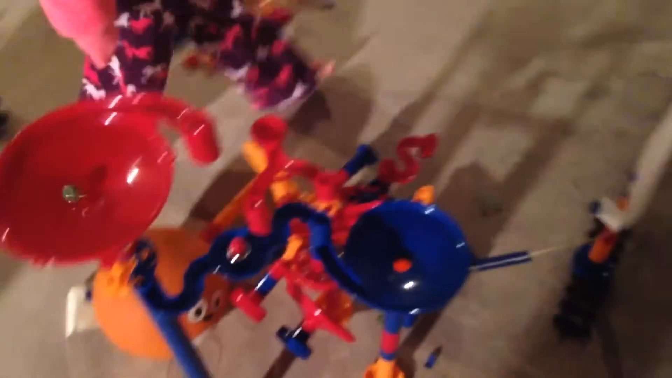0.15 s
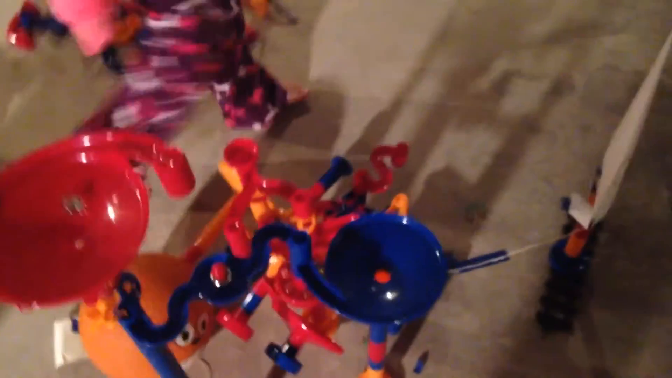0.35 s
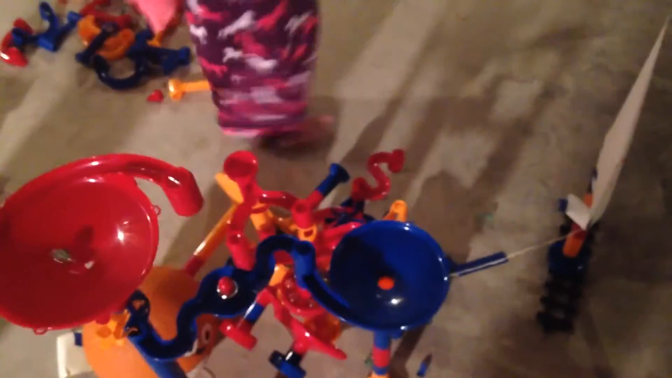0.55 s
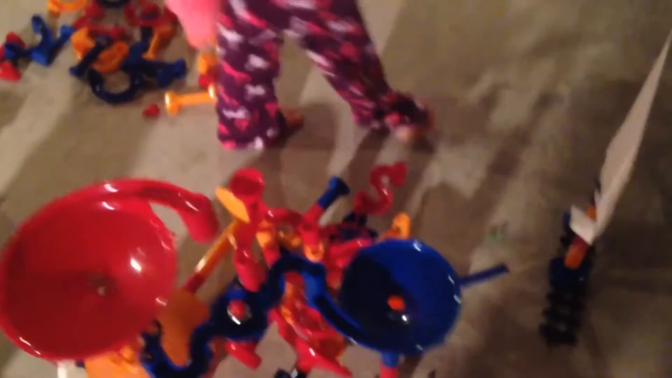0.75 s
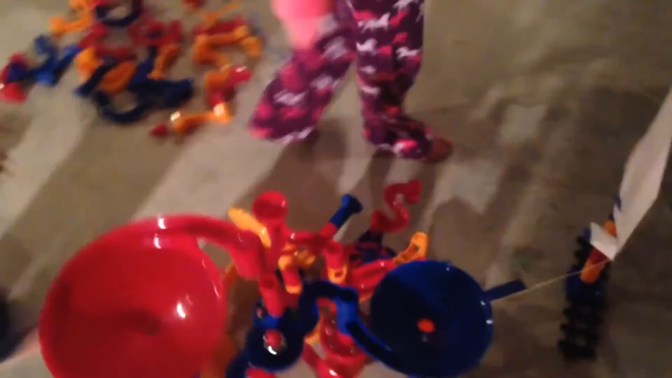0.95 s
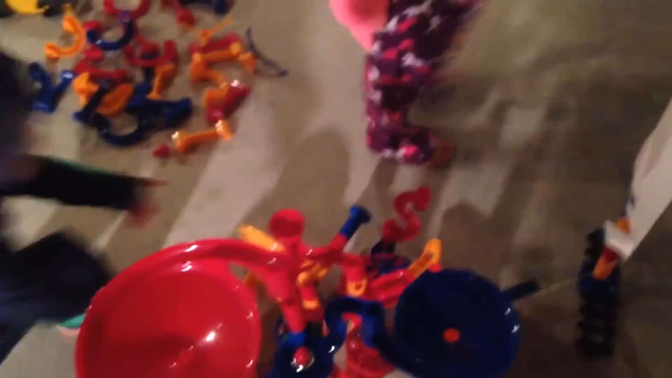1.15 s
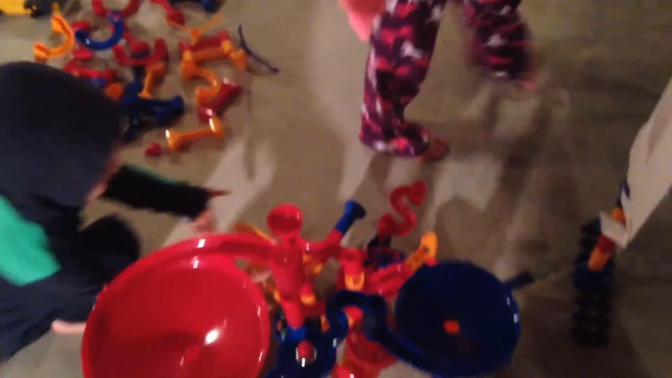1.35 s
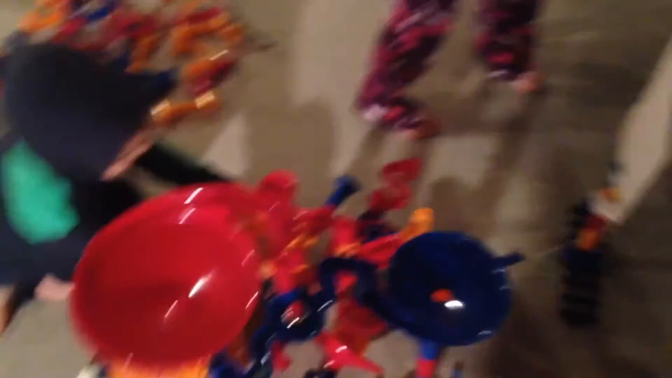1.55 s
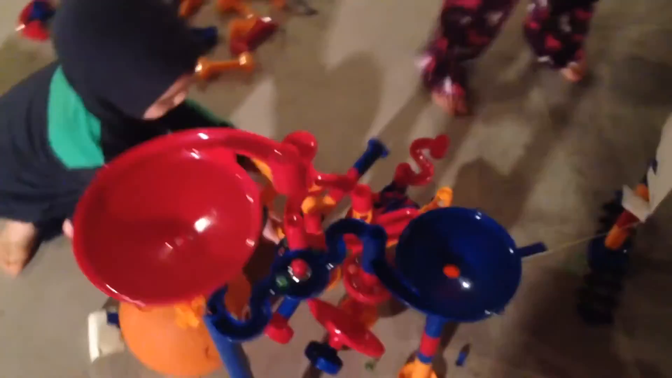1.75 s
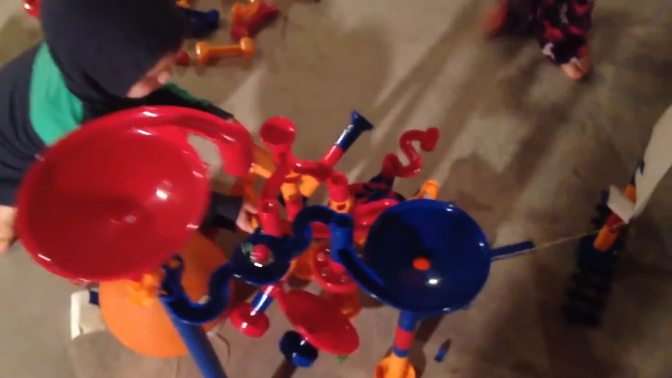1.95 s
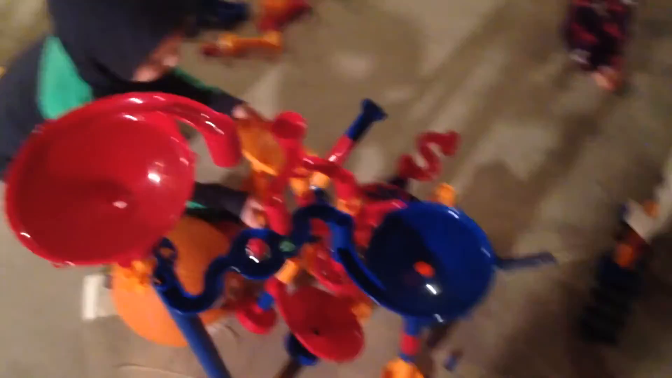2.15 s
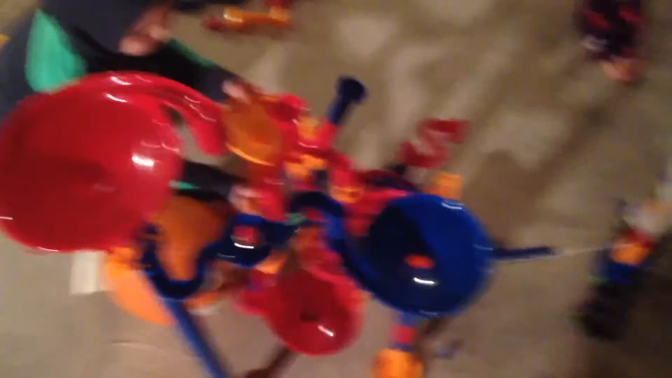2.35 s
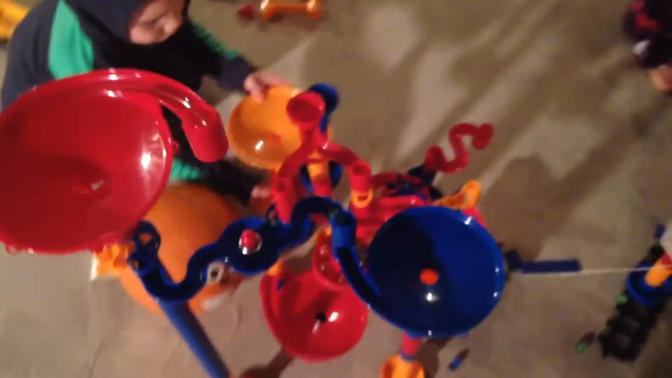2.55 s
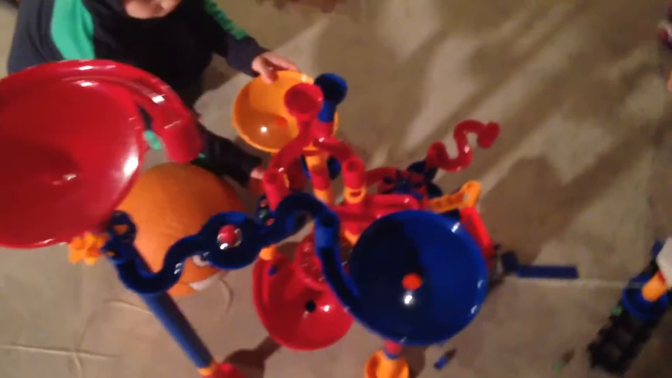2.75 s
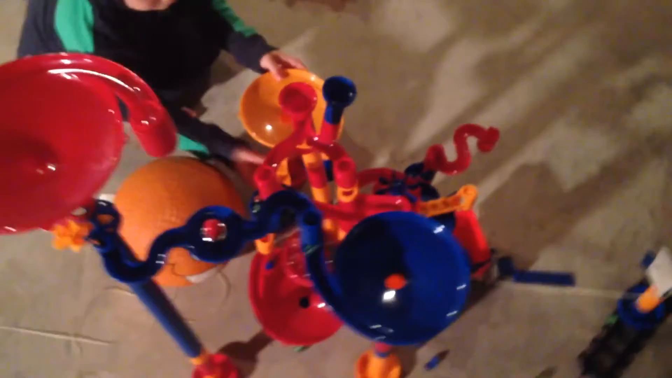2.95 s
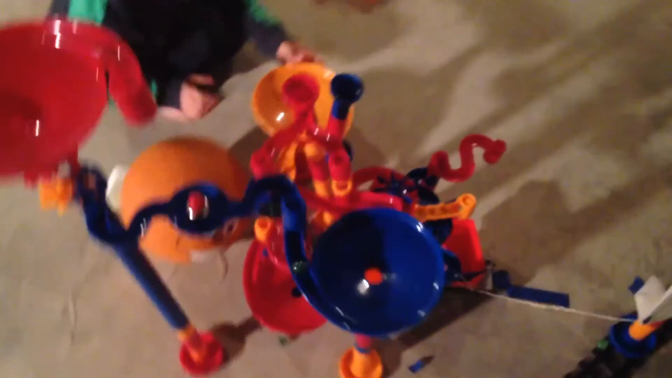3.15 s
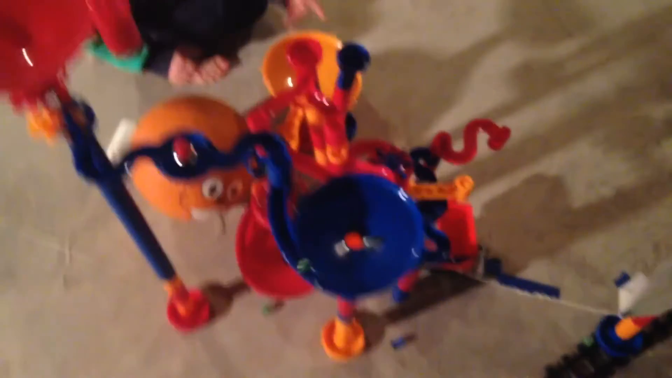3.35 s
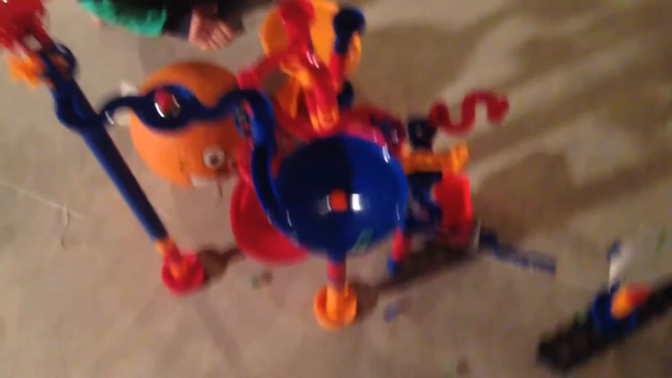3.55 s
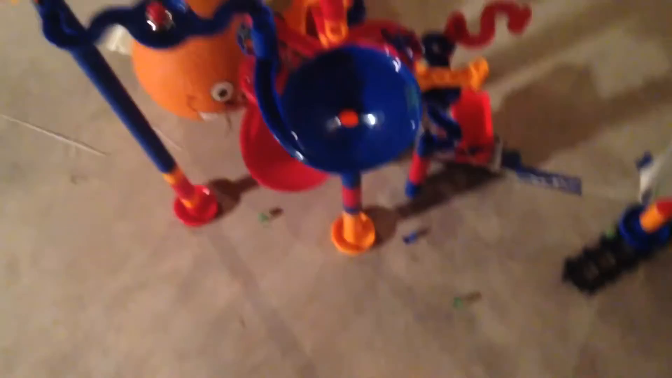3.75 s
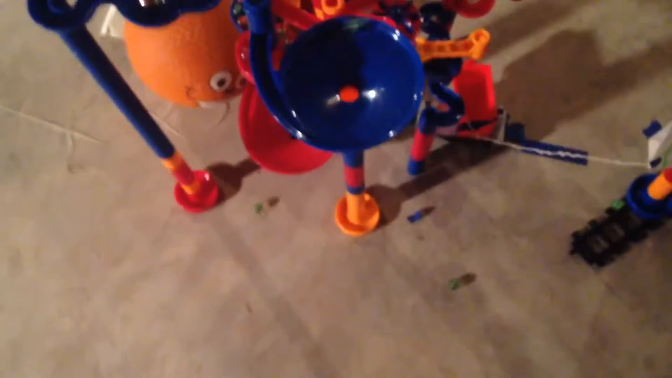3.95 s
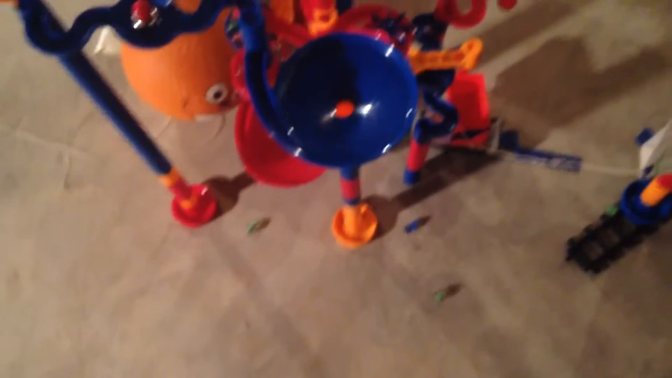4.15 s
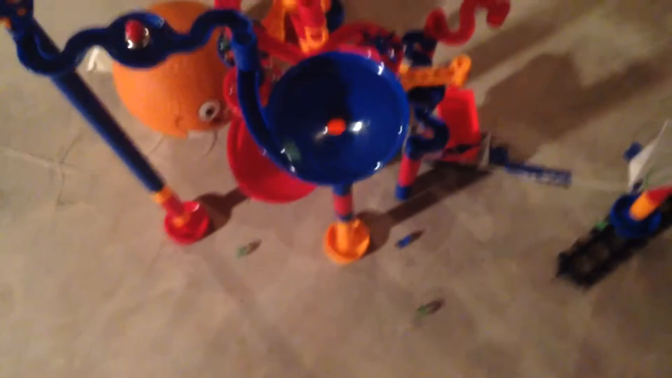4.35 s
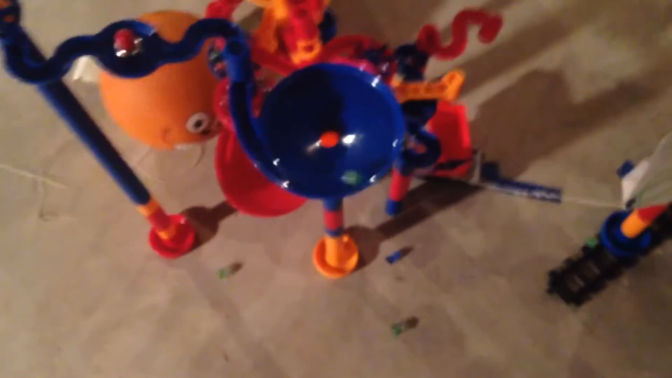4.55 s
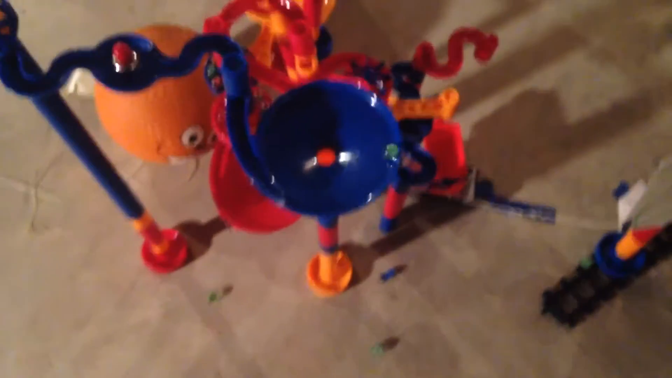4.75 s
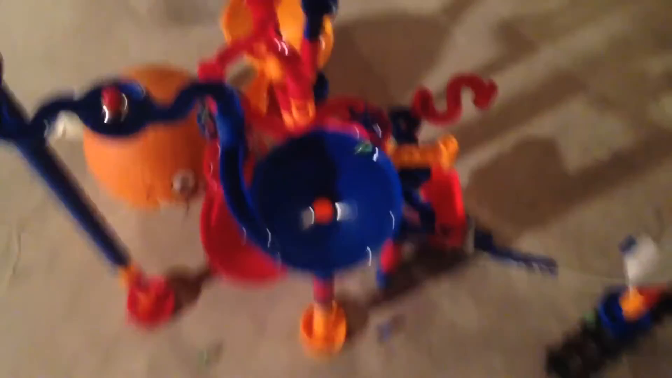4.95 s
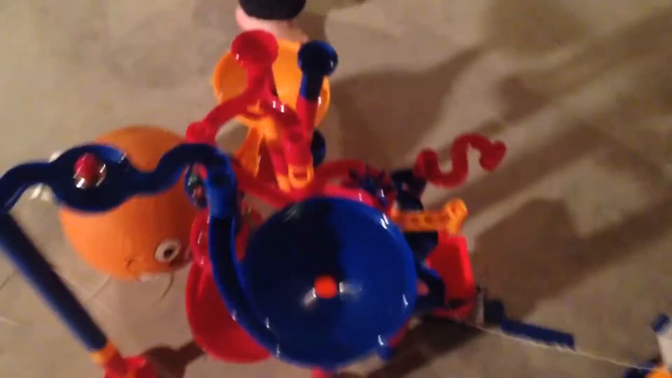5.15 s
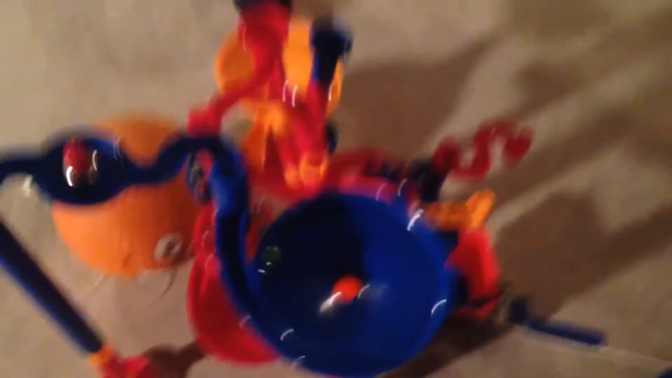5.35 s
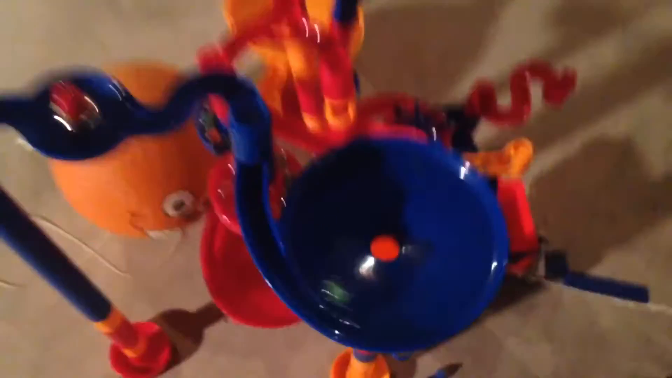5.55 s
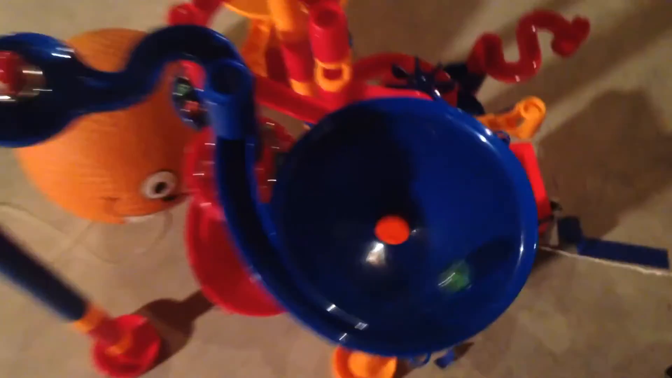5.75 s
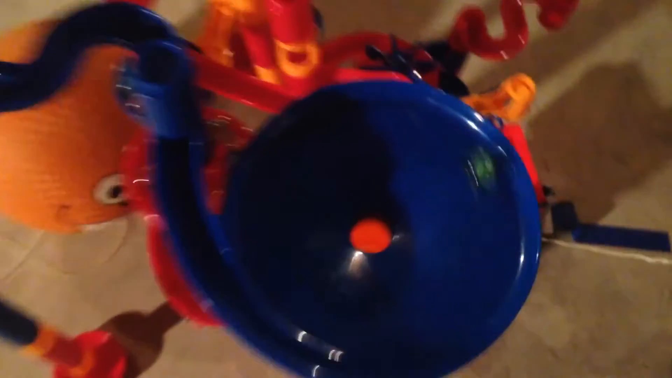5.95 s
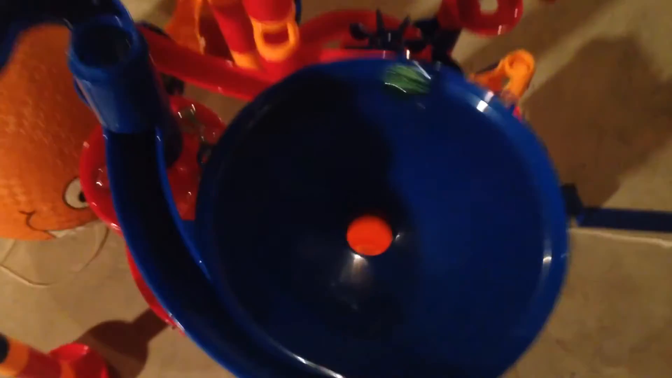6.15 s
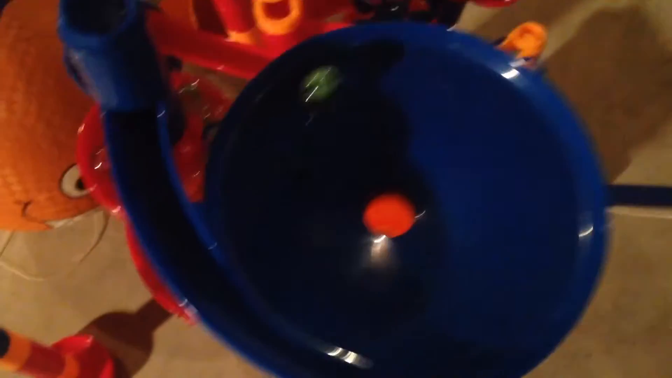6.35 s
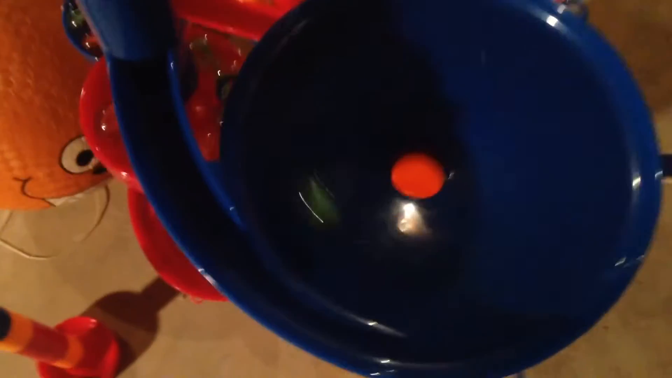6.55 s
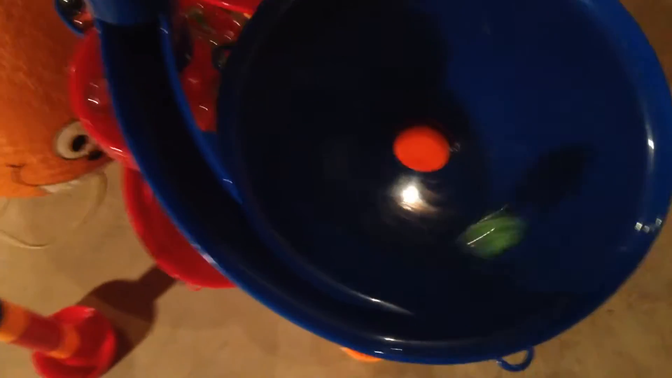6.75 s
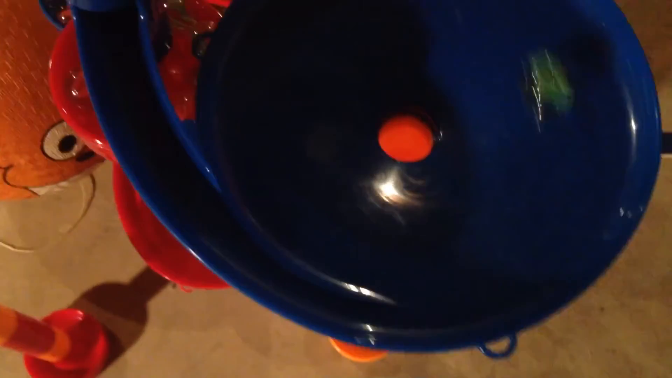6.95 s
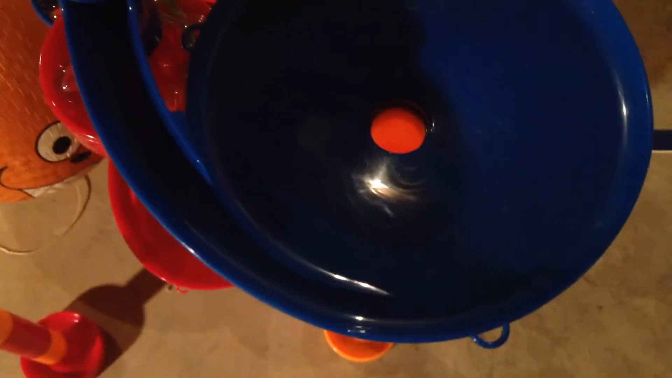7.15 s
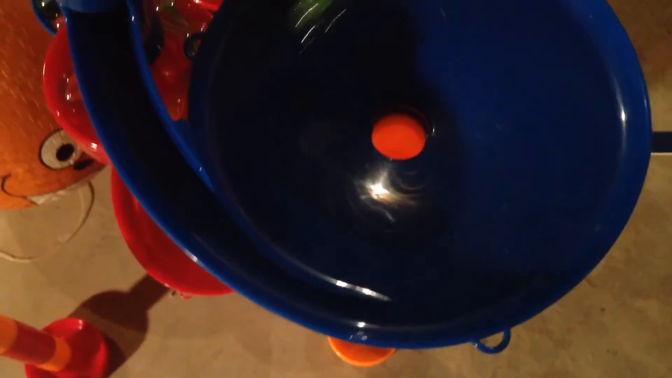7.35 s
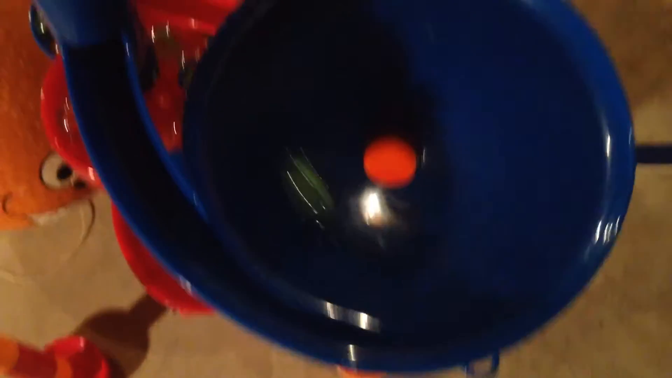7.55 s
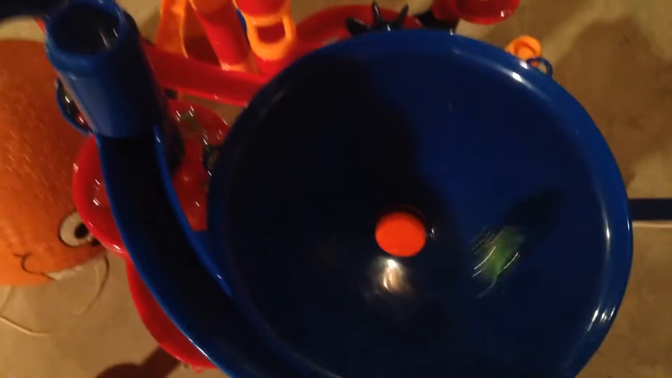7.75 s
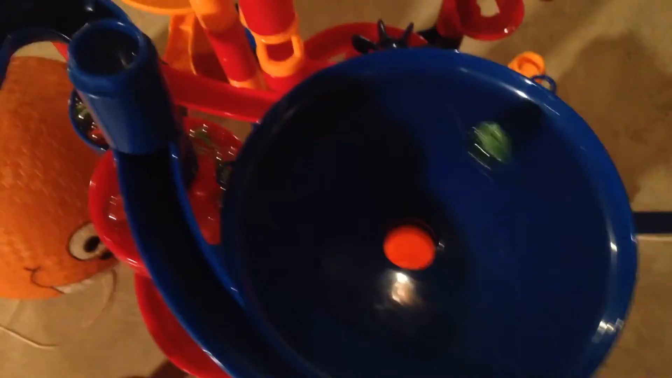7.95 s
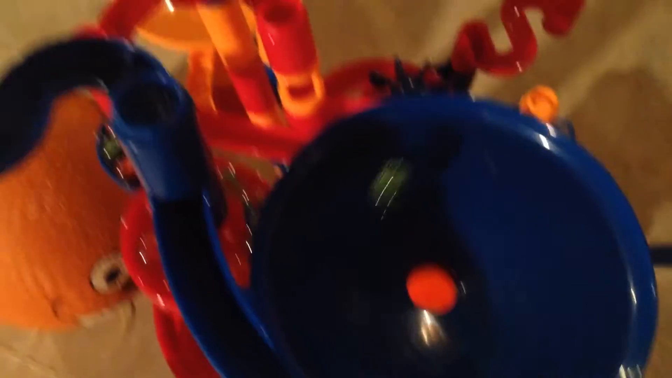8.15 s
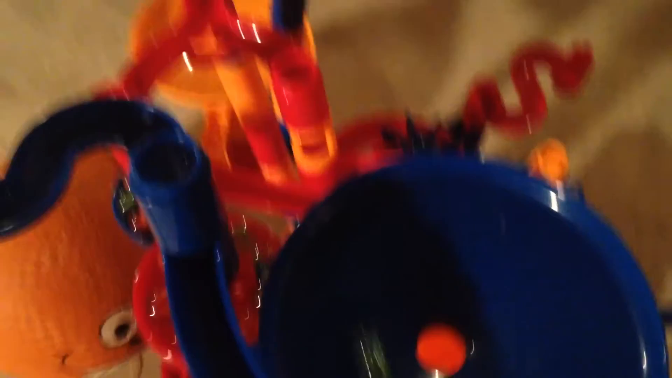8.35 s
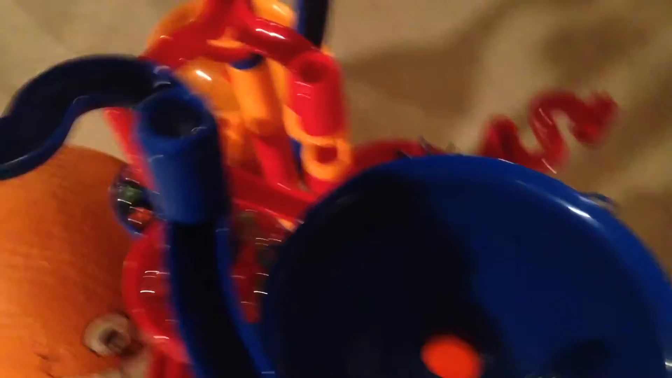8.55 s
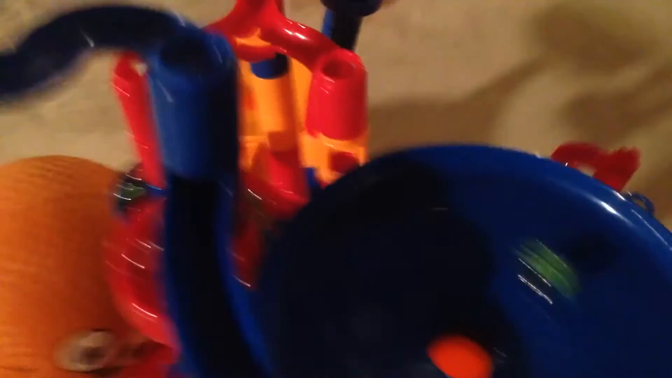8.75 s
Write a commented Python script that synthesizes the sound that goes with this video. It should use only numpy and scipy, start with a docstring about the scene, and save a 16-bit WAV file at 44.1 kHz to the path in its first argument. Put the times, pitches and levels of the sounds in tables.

```python
"""In a quiet room, close to a plastic marble run: glass marbles rumble along chutes, drop from piece to
piece and knock together; then one circles in a big plastic funnel, a whirr full of ticks that brightens.
Impacts excite damped modes of the plastic, rolling is a dense train of tiny impacts,
and hums, scrapes and rushes are noise in narrow resonances, steady or gliding."""
import sys
import numpy as np
from scipy import signal
from scipy.fft import rfft, irfft
from scipy.io import wavfile
from scipy.ndimage import uniform_filter1d, map_coordinates

SR = 44100
rng = np.random.default_rng(int(sys.argv[2]) if len(sys.argv) > 2 else 0)


def wav_out(sig):
    """Save sig, one row per channel (or a flat mono array), as 16-bit PCM at SR to the path in sys.argv[1]."""
    wavfile.write(sys.argv[1], SR, np.round(np.clip(np.atleast_2d(sig).T, -1, 1) * 32767).astype(np.int16))


N = 388962
TIME = np.arange(N) / SR  # [s]
RING = np.arange(SR // 4) / SR  # time after one impact [s]


def amp(db):
    """Decibel law: level to amplitude gain."""
    return 10 ** (np.asarray(db) / 20)


def unit(x):
    """Normalisation to rms 1."""
    return x / np.sqrt(np.mean(x ** 2) + 1e-20)


def even(x, window_s):
    """Level compression: fine grain stays, rms is held near 1 over spans longer than the window."""
    size = int(window_s * SR)
    power = uniform_filter1d(uniform_filter1d(x * x, size), size)
    return x / np.sqrt(np.abs(power) + 1e-20)


def along(points, hz):
    """Interpolation of (frequency [Hz], value) points on a logarithmic frequency axis."""
    point_hz, value = np.transpose(points)
    return np.interp(np.log(hz + 1), np.log(point_hz + 1), value)


def gains(rows):
    """Envelopes: one gain curve for each level column, next to silent (-120 dB) outside the rows."""
    s, *columns = np.transpose(rows)
    return [amp(np.interp(TIME, s, column, left=-120, right=-120)) for column in columns]


def swell(start, length, rise_db_per_s, fall_db_per_s):
    """Exponential growth and decay: gain rises to 1 at start, holds for length, then dies away."""
    before = np.maximum(start - TIME, 0)
    after = np.maximum(TIME - start - length, 0)
    return amp(-rise_db_per_s * before - fall_db_per_s * after)


def wobble(rate):
    """Slow random modulation: a smooth curve through rate random knots a second."""
    return map_coordinates(rng.standard_normal(N // 20), [TIME * rate], mode="mirror")


def noise(spectrum, size):
    """Spectral shaping of white noise, to rms 1."""
    gain = amp(along(spectrum, np.fft.rfftfreq(size, 1 / SR)))
    return unit(irfft(rfft(rng.standard_normal(size)) * gain, size))


def bands(x, edges):
    """Causal band splitting at the edge frequencies [Hz], lowest band first."""
    parts = []
    for hz in edges:
        parts.append(signal.sosfilt(signal.butter(4, hz, "low", fs=SR, output="sos"), x))
        x = signal.sosfilt(signal.butter(4, hz, "high", fs=SR, output="sos"), x)
    return parts + [x]


def add(track, s, sound):
    """Superposition: mix a sound in at time s."""
    part = track[max(round(s * SR), 0):][:len(sound)]
    part += sound[:len(part)]


def gliding(hz, width_hz, grain_db=2):
    """Resonance of grainy noise: lowpass noise shifted up to hz, steady or moving, at rms 1."""
    drive = rng.standard_normal(N) + 1j * rng.standard_normal(N)
    drive = drive * amp(grain_db * np.minimum(wobble(140), 2))
    flutter = signal.sosfilt(signal.butter(2, width_hz / 2, fs=SR, output="sos"), drive)
    turns = np.cumsum(hz * np.ones(N)) / SR
    return unit((flutter * np.exp(2j * np.pi * turns)).real)


def strike(modes, shell, shell_db, shell_t60, scatter_db, detune):
    """Modal excitation: each spot drives the modes differently, over a short clack of the shell."""
    hz, db, t60 = np.transpose(modes)[:, :, None]
    level, pitch, phase = rng.standard_normal((3, len(modes), 1))
    decay = amp(db + scatter_db * level - 60 * RING / t60)
    ring = decay * np.sin(2 * np.pi * (hz * (1 + detune * pitch) * RING + phase))
    clack = amp(shell_db - 60 * RING / shell_t60) * noise(shell, len(RING))
    contact = 1 - np.exp(-(RING / 0.00079) ** 2)  # the contact takes a moment
    return (ring.sum(axis=0) + clack) * contact


EDGE_GROWS = 1.21  # glassy edge per hardness [dB/dB]


def blows(rows, contact, thud_db, clack_db, snap_db, edge_db):
    """Impact spectra: heavy landings thud, hard ones snap with a glassy edge; thin plastic has no bass."""
    out = np.zeros(N)
    for s, db, thud, hardness, *spot in rows:
        parts = bands(contact(*spot), (300, 1100, 3000, 7000))[1:]
        levels = amp([thud + thud_db, clack_db, hardness + snap_db, EDGE_GROWS * hardness + edge_db])
        # each band is scaled by its strength in the first 1/80 s
        add(out, s, amp(db) * sum(g * p / np.std(p[:SR // 80]) for g, p in zip(levels, parts)))
    return out


SPOTS_PER_S = 7


def rolling(contact, rate, spread_db, wander_db, count):
    """Rolling as random impacts: hops over bumps of unequal size; spots of the plastic take turns."""
    out = np.zeros(N)
    knots = np.arange(0, TIME[-1] + 1, 1 / SPOTS_PER_S)
    for _ in range(count):
        hops = (rng.random(N) < rate / count / SR) * rng.choice([-1, 1], N)
        nearness = np.interp(TIME, knots, rng.standard_normal(len(knots)))
        sizes = amp(spread_db * np.minimum(rng.standard_normal(N), 2) + wander_db * nearness)
        out += signal.oaconvolve(hops * sizes, contact())[:N]
    return out


# spectrum of the room tone: (frequency [Hz], relative density [dB/Hz])
AIR_SPECTRUM = [(15, -59), (25, -16), (86, -5.5), (160, -4.5), (246, -4.5), (350, -11.5), (666, -7.5),
                (895, -12.5), (1450, -12), (4260, -15), (9050, -19), (15500, -20)]


def room_tone():
    """Stationary background noise of the quiet room."""
    return amp(-64.0) * noise(AIR_SPECTRUM, N)


# decay of the room: (frequency [Hz], t60 [s])
ROOM_DECAY = [(200, 0.39), (1500, 0.26), (5000, 0.29), (14000, 0.17)]


def room(x):
    """Reverberation: convolution with decaying noise whose high treble dies first."""
    hz, t, z = signal.stft(rng.standard_normal(SR // 2), SR, nperseg=256)
    decay = amp(-60 * t / along(ROOM_DECAY, hz)[:, None])
    tail = signal.istft(z * decay, SR, nperseg=256)[1]
    response = np.pad(tail / np.linalg.norm(tail), (SR // 200, 0))  # 5 ms before the walls answer
    return signal.oaconvolve(x, response)[:N]


# a marble swings through the top funnel: (time of the fastest moment [s], relative level [dB])
TOP_SWINGS = [(0, -46), (.075, -57), (0.353, -39)]


def swings(fade_db_per_s=291, rasp_db=-3):
    """Cavity resonance: the top funnel hums at 1420 Hz with a broad rasp as a marble swings through."""
    level = sum(amp(db) * swell(s, 0, fade_db_per_s, fade_db_per_s) for s, db in TOP_SWINGS)
    return level * (gliding(1420, width_hz=54) + amp(rasp_db) * gliding(1980, width_hz=920))


# marbles run along one stretch of chute:
# (start [s], length [s], relative level of the rattle [dB], rumble relative to the rattle [dB])
CHUTE_RUNS = [(0, 0.12, -51.5, -4), (0.332, 0.024, -47, -1.5), (0.666, 0.081, -35, -15),
              (0.9, 0.042, -42, -1.5), (0.997, 0.081, -36.5, 2), (1.143, 0.042, -37, -3.5),
              (1.232, 0.051, -36, -11), (1.386, 0.18, -54.5, -4.5), (1.629, 0.012, -38.5, -5),
              (2.021, 0.11, -39.5, -8.5), (2.236, 0.2, -48, -5.5), (2.498, 0.075, -32, -11)]
# ringing of the upper chutes: (frequency [Hz], relative level [dB], t60 [s])
CHUTE_MODES = [(405.6, -3, 0.07), (564, -6, 0.12), (778, 5, 0.02), (898, -7, 0.16), (1388, -5.5, 0.11),
               (1395, 2, 0.16), (1560, -8, 0.11), (1870, 7, 0.044), (2110, 6.5, 0.055), (2190, 5, 0.049),
               (2350, 2, 0.076), (3580, -10.5, 0.23), (4120, -4.5, 0.058), (5400, -6.5, 0.028)]
# dense, quickly damped modes of the thin track: (frequency [Hz], relative density [dB/Hz])
TRACK_SHELL = [(120, -36), (300, -39), (420, -1), (1050, -9), (1500, 10), (2200, 4.5), (3000, 0),
               (4500, -1), (7000, -11.5), (11000, -16.5), (15500, -28)]


def chute_runs(rise_db_per_s=1300, fall_db_per_s=304):
    """Rolling contact: marbles rattle and rumble along the track in short stretches."""
    hop = lambda: strike(CHUTE_MODES, TRACK_SHELL, shell_db=15.0, shell_t60=0.025, scatter_db=3, detune=0.011)
    _, rumble, rattle = bands(rolling(hop, rate=420, spread_db=4, wander_db=3, count=8), (300, 1100))
    rumble, rattle = even(rumble, .04), even(rattle, .04)
    out = np.zeros(N)
    for s, length, db, rumble_db in CHUTE_RUNS:
        level = amp(db) * swell(s, length, rise_db_per_s, fall_db_per_s)
        out += level * (rattle + amp(rumble_db) * rumble)
    return amp(-4.5) * out


def bouncing(modes, gap=.003, rebound=0.5, count=3):
    """Restitution: a marble lands and chatters, each quick rebound half as strong before scatter."""
    out = np.zeros(len(RING))
    starts = np.r_[0, np.cumsum(gap * rng.uniform(.7, 1.3, count - 1))]
    for k, s in enumerate(starts):
        hit = strike(modes, TRACK_SHELL, shell_db=11.5, shell_t60=0.048, scatter_db=2.5, detune=.009)
        add(out, s, rebound ** k * hit)
    return out


# a marble strikes the track; each spot has its own body note and snap; thud and hardness add to the level:
# (time [s], relative level [dB], thud [dB], hardness [dB], nominal body note [Hz], nominal snap [Hz])
TRACK_KNOCKS = [(0.052, -30, -12, -17, 1443, 2640), (0.589, -30.5, -9, -13.5, 1890, 4000),
                (0.626, -32.5, -7, -14, 1780, 2600), (0.6354, -26.5, -26, -6, 1500, 3120),
                (0.6446, -22.5, -18, -7, 1635, 3220), (0.662, -18.5, -10, -15, 1870, 3210),
                (0.7206, -23.5, -32, -25, 1550, 2580), (0.7363, -24, -16, -11, 1933, 3080),
                (0.757, -29, 3, -2, 1370, 5560), (0.8918, -31, -14, -6.5, 1410, 2740),
                (0.9074, -24, -4.5, -18, 1770, 2660), (0.941, -23.5, -8.5, -10.5, 1830, 2600),
                (0.973, -12, -8.5, -9.5, 1714, 3150), (1.006, -23, -4, -6.5, 1390, 2610),
                (1.0526, -30, -12, -10, 1310, 3130), (1.127, -34, 1, -9, 1730, 2600),
                (1.1367, -22.5, -14, -16, 1834, 4400), (1.1742, -26, -7, -22, 1590, 3400),
                (1.204, -15.5, -10, -6.5, 1410, 4310), (1.222, -26, -13, -11, 1320, 4650),
                (1.255, -15, -19, -6.5, 1380, 4290), (1.282, -26, -29, -16, 1900, 3350),
                (1.313, -35, -20, -15, 2100, 3980), (1.51, -44.5, -21, -3.5, 1420, 4620),
                (1.621, -25, -10.5, 3.5, 1394, 3330), (1.807, -50, -25, 0, 1640, 3200),
                (1.937, -39, -1.5, -27, 1880, 2570), (2.0239, -26.5, -6, -10, 1896, 3310),
                (2.073, -33, -5, 7.5, 1940, 3410), (2.092, -30, -8, -19.5, 1900, 2840),
                (2.121, -28.5, -1, -0.5, 1136, 3340), (2.295, -36, -12, -10.5, 1900, 3480),
                (2.3165, -35, 2.5, -8, 1980, 3200), (2.361, -38, -9, -6, 1250, 3630),
                (2.386, -34.5, -15, -14, 1640, 3350), (2.428, -37.5, -22, -13.5, 1880, 2600),
                (2.476, -26, -1, 2, 2490, 3380), (2.5188, -20, -1.5, 2, 1357, 4710),
                (2.527, -17, -6, -30, 1670, 3330), (2.5608, -25.5, -5, -5.5, 1410, 4040),
                (3.0623, -46, -6, -7.5, 1390, 3930), (3.076, -39, -14, -20, 1875, 3200)]
# when the marbles reach the upper chutes, lowest chute, tube, bend and cup: (time [s])
PIECE_STARTS = [0, 1.19, 1.55, 1.9, 2.45]
# ringing of the lowest chute, drop tube, hollow bend and cup: (frequency [Hz], relative level [dB], t60 [s])
LOW_CHUTE_MODES = [(416, 12, 0.091), (657, -1, 0.11), (820, 1, 0.11), (885, 2, 0.057), (1310, -0.5, 0.11),
                   (2130, -4, 0.17), (2214, 0, 0.068), (2340, -1.5, 0.11), (3537, -9.5, 0.082),
                   (4090, -12, 0.17), (5760, -14.5, 0.083)]
TUBE_MODES = [(680, -2, 0.19), (1394, 1, 0.12), (1940, 6.5, 0.15), (2066, -1, 0.076), (2485, -4, 0.08),
              (3233, -7, 0.074), (3690, -8, 0.056), (4000, -13, 0.049), (4400, -9, 0.066),
              (6360, -17.5, 0.08), (6900, -16, 0.08)]
BEND_MODES = [(978, -0.5, 0.1), (1220, -3, 0.085), (1410, 0, 0.06), (1900, 1.5, 0.14), (2340, 7, 0.046),
              (3350, -5, 0.055)]
CUP_MODES = [(597, -0.5, 0.1), (1414, 10, 0.099), (1420, 7, 0.18), (1664, 1.5, 0.17), (2460, 3, 0.064),
             (3400, -10, 0.18), (4040, -15, 0.19), (6142, -5.5, 0.044)]


def knocks():
    """Modal impact: each drop rings the modes of its piece and two modes of the struck spot."""
    rows = np.array(TRACK_KNOCKS)
    piece = np.searchsorted(PIECE_STARTS, rows[:, 0]) - 1
    out = np.zeros(N)
    for k, modes in enumerate([CHUTE_MODES, LOW_CHUTE_MODES, TUBE_MODES, BEND_MODES, CUP_MODES]):
        landing = lambda body_hz, snap_hz: bouncing(modes + [(body_hz, 16, 0.046), (snap_hz, 6.5, 0.033)])
        out += blows(rows[piece == k], landing, thud_db=-11.5, clack_db=-7.0, snap_db=-6, edge_db=-19.0)
    return out


# a marble coasts smoothly: (start [s], length [s], relative level [dB])
SMOOTH_COASTS = [(0.58, 0.026, -65), (0.674, 0.059, -48), (1.454, 0.06, -57.5), (1.574, 0.051, -62),
                 (2.97, 0.12, -66.5)]


def coasting(hz=1403, rise_db_per_s=259, fall_db_per_s=203):
    """Narrowband resonance: between drops a marble rolls smoothly and the chute sings one note."""
    level = sum(amp(db) * swell(s, length, rise_db_per_s, fall_db_per_s) for s, length, db in SMOOTH_COASTS)
    return level * even(gliding(hz, width_hz=50), .03)


# two marbles meet, glass on glass: (time [s], relative level [dB])
MARBLE_CLICKS = [(0.7514, -39.5), (0.765, -45), (1.0408, -48.5), (1.06, -44), (1.0757, -49), (2.9922, -63)]


def clicks():
    """Collision of glass on glass: a chattering contact with a strong edge, over the chute's modes."""
    rows = [(s, db, 0, 0) for s, db in MARBLE_CLICKS]
    return blows(rows, lambda: bouncing(CHUTE_MODES), thud_db=-0.5, clack_db=-4.0, snap_db=-2.5, edge_db=1)


# the tower shakes while marbles race through it: (start [s], length [s], relative level [dB])
TOWER_SHAKES = [(0.9, 0.395, -66), (2.08, 0.29, -63.5)]
# the whole tower bumps on the floor: (time [s], relative level [dB], spectral peak [Hz])
TOWER_BUMPS = [(1.222, -51, 110), (2.068, -44.5, 125), (2.521, -44, 222), (3.0, -60, 69)]


def bumps(t60=0.057):
    """Structure-borne sound: the tower rumbles, and its feet thump as decaying low noise."""
    level = sum(amp(db) * swell(s, length, rise_db_per_s=399, fall_db_per_s=200)
                for s, length, db in TOWER_SHAKES)
    out = level * noise([(50, -35), (130, -11), (200, -4.5), (330, -2), (450, -12), (1000, -58.5)], N)
    for s, db, hz in TOWER_BUMPS:
        colour = [(hz / 5, -22), (hz / 2, -8), (hz, 0), (hz * 2, -8), (hz * 4, -40), (3000, -100)]
        add(out, s, amp(db - 60 * RING / t60) * noise(colour, len(RING)))
    return out


def ping(s=1.622, hz=12352, db=-34, t60=0.12, split_hz=95):
    """Beating of two close modes: one hard landing leaves a thin, high ring; the upper mode dies first."""
    out = np.zeros(N)
    fade = amp(-60 * RING / t60)
    lower = np.sin(2 * np.pi * hz * RING)
    upper = fade * np.sin(2 * np.pi * (hz + split_hz) * RING)
    add(out, s, amp(db) * fade * (lower + upper))
    return out


# a marble slides into the bend, and later into the bowl: (time [s], relative level [dB])
PIECE_SLIDES = [(2.06, -45.5), (5.98, -48)]


def slide(rise_db_per_s=155, fade_db_per_s=66):
    """Friction noise in a resonance: a brief low rasp as a marble slides into a hollow piece."""
    level = sum(amp(db) * swell(s, 0, rise_db_per_s, fade_db_per_s) for s, db in PIECE_SLIDES)
    return level * gliding(1053, width_hz=360)


def rush(start=2.08, length=0.27, db=-42, fade_db_per_s=22, hz=1012, rise_hz_per_s=2300):
    """Rising resonance: a grainy rush climbs and thins out as the marble gathers speed and leaves."""
    t = np.clip(TIME - start, 0, length)
    level = amp(db - fade_db_per_s * t) * swell(start, length, rise_db_per_s=165, fall_db_per_s=226)
    return level * gliding(hz + rise_hz_per_s * t, width_hz=680, grain_db=4.5)


def bend_hum(start=2.172, length=0.032, db=-33.5, hz=907, glide_hz_per_s=520):
    """Cavity resonance: the hollow bend hums, rising in pitch, as a marble runs round it."""
    level = amp(db) * swell(start, length, rise_db_per_s=380, fall_db_per_s=234.5)
    pitch = hz + glide_hz_per_s * np.clip(TIME - start, -.1, .1)
    return level * even(gliding(pitch, width_hz=62, grain_db=-4), 0.027)


# rolling in the funnel: (time [s], relative level of the hum [dB], of the whirr [dB], of the treble [dB])
FUNNEL_ROLL = [(2.85, -95, -91, -91), (3.0, -76.5, -65.5, -65), (3.18, -67, -54, -62.5),
               (3.41, -60, -49, -52), (3.55, -61, -49, -56.5), (3.9, -57, -49.5, -57.5),
               (4.33, -55, -58.5, -62.5), (4.68, -71, -52, -61.5), (5.21, -50.5, -50.5, -62),
               (5.47, -52.5, -53.5, -60), (5.65, -49, -52, -49.5), (5.8, -46, -44.5, -51.5),
               (6.01, -52, -50.5, -64.5), (6.2, -41.5, -42.5, -52), (6.38, -44.5, -48, -51),
               (6.71, -45.5, -52.5, -51.5), (7.12, -42.5, -48, -50.5), (7.6, -47.5, -48, -49.5),
               (7.86, -47.5, -56, -54), (8.08, -47.5, -51, -50.5), (8.29, -46.5, -46, -46.5),
               (8.41, -58, -58, -48), (8.5, -45.5, -46.5, -50), (8.72, -44, -52, -41),
               (8.82, -45.5, -47, -54)]


def stand():
    """Structure-borne sound: the stand shakes with low noise that follows the hum of the roll."""
    spectrum = [(40, -4), (90, -4.0), (200, 10.0), (260, -2.5), (330, 8.5), (450, -28.0), (1000, -66)]
    return amp(-25.5) * gains(FUNNEL_ROLL)[0] * noise(spectrum, N)


def wavering(x, share=.024, rate=11):
    """Frequency modulation: the wall's resonances drift as the marble moves over it."""
    return map_coordinates(x, [np.cumsum(1 + share * wobble(rate))], mode="mirror")


# dense, quickly damped modes of the funnel wall: (frequency [Hz], relative density [dB/Hz])
FUNNEL_SHELL = [(150, -8), (420, -41), (650, 11.5), (850, 1.5), (1400, 6), (2300, -1.5), (3500, -7.5),
                (4800, -13), (7000, -21), (10000, -28.5), (15500, -39)]


def whirr(modes, spread_db, lumpy_db, hum_db, wall_db, grit_db):
    """Rolling contact in three bands: a steady low hum, the whirr of the wall and fine grit."""
    hop = lambda: strike(modes, FUNNEL_SHELL, shell_db=3.0, shell_t60=0.03, scatter_db=2.5, detune=.005)
    roll = rolling(hop, rate=480, spread_db=spread_db, wander_db=3, count=8)
    hum, wall, grit = bands(roll, (500, 800, 1750))[1:]
    chatter = np.minimum(wobble(40) + 0.39 * wobble(12), 2)  # the marble presses now harder, now lighter
    levels = amp([[hum_db], [wall_db], [grit_db]]) * gains(FUNNEL_ROLL)
    parts = even(hum, .025), even(wavering(wall), .14), even(wavering(grit), .14)
    depths = [.7, 1.4, 2.2]  # the treble chatters most
    return sum(amp(depth * lumpy_db * chatter) * level * part
               for depth, level, part in zip(depths, levels, parts))


def descent(start=4.98, length=0.96):
    """Linear transition: 0 while the marble runs near the rim, 1 once it is down in the bowl."""
    return np.clip((TIME - start) / length, 0, 1)


# ringing with the marble near the rim, then further down: (frequency [Hz], relative level [dB], t60 [s])
RIM_MODES = [(605, -0.5, 0.044), (673, 4.5, 0.11), (958, -2, 0.15), (1107, 3.5, 0.053), (1192, 1, 0.044),
             (1440, 7, 0.065), (1941, -0.5, 0.13), (2492, -8.5, 0.054), (3220, -4.5, 0.057),
             (4200, -7, 0.035)]
BOWL_MODES = [(615, -2.5, 0.075), (662.5, 9.5, 0.13), (937, -6, 0.1), (1160, -18, 0.095),
              (1430, -3.5, 0.12), (1426, -6, 0.033), (1930, -7, 0.049), (2104, 4, 0.021), (2500, 3.5, 0.01),
              (2530, -17, 0.036), (3200, -10, 0.054), (4440, -22, 0.027)]


def funnel_roll():
    """Equal-power crossfade: the roll passes from the rim's modes to the bowl's."""
    turn = np.pi / 2 * descent()
    rim = whirr(RIM_MODES, spread_db=4.5, lumpy_db=1.5, hum_db=-4, wall_db=-2, grit_db=-1.5)
    bowl = whirr(BOWL_MODES, spread_db=5.5, lumpy_db=1.77, hum_db=-6, wall_db=-1.5, grit_db=-2.5)
    return np.cos(turn) * rim + np.sin(turn) * bowl


# ringing of the funnel under a sharp tap: (frequency [Hz], relative level [dB], t60 [s])
TAP_MODES = [(655.4, 0.5, 0.19), (938, 1, 0.089), (1166, 2, 0.15), (1443, 12.5, 0.11), (1960, 8, 0.064),
             (2482, 4.5, 0.057), (2740, -9.5, 0.094), (3200, -2.5, 0.048), (3660, -13, 0.085),
             (3920, -14, 0.098), (4170, -15.5, 0.081)]


def ticks(start=3.2, rate=24):
    """Poisson impacts: specks and seams give small bright ticks, louder when the roll is gritty."""
    times = start + np.cumsum(rng.exponential(1 / rate, 200))
    grit = np.interp(times, TIME, gains(FUNNEL_ROLL)[2])
    sizes = amp(1.5 * rng.uniform(-2.2, 1, len(times))) * grit
    out = np.zeros(N)
    for s, size in zip(times[times < TIME[-1]], sizes):
        tap = strike(TAP_MODES, TRACK_SHELL, shell_db=9, shell_t60=.04, scatter_db=5, detune=.03)
        tick = bands(tap, (1500, 6000))[1]
        add(out, s, size * tick / np.std(tick[:SR // 100]))
    return out


# the circling marble skips; thud and hardness add to the level:
# (time [s], relative level [dB], thud [dB], hardness [dB])
FUNNEL_SKIPS = [(3.2255, -52, -2, -5), (3.325, -41, 8, -8), (3.568, -47, 0, -7.5), (3.676, -41, 8, -12.5),
                (3.757, -45, -11, -17), (3.877, -43.5, -4, -14), (3.991, -35, -5, -15.5),
                (4.4602, -54, -6, -4), (4.559, -41.5, 1, -9.5), (4.831, -42.5, -5, -16),
                (4.8792, -52, -10, -7), (4.9845, -49, -6, -12), (5.228, -45, 8, -14), (5.343, -45, 11, -26),
                (5.38, -49, -6, -8), (5.595, -50.5, -6, -2), (5.648, -49, -8, 0), (5.935, -34, 10, -13.5),
                (5.944, -25.5, 1, -21), (6.027, -38.5, 3, -12.5), (6.134, -40.5, 1, -10),
                (6.153, -40, -4, -13), (6.281, -33.5, -16, -13.5), (6.337, -40, 5, -9.5),
                (6.403, -38.5, -6, -7.5), (6.421, -41, -2, -5), (6.534, -35, -15, -9),
                (6.5625, -34.5, -3, -7.5), (6.7, -37, -2, -10.5), (6.793, -36, -18, -10),
                (6.868, -36.5, -4, -14), (7.033, -34.5, -12, -17), (7.255, -40.5, 11.5, -27),
                (7.3237, -41, 4, -6), (7.437, -49, -6, -8), (7.482, -41, -7, -8), (7.572, -43, -10, -16),
                (7.6172, -33, -8, 4), (7.658, -37.5, -17, -1.5), (7.715, -39.5, 9, -6.5),
                (7.772, -43.5, 2, -10), (7.886, -49.5, 0, 6), (7.968, -39, -14, -10),
                (8.028, -52.5, -12, 6.5), (8.0675, -48, 2, -6), (8.154, -42, 1, -14), (8.236, -34, -4, -16),
                (8.262, -40, 8, -5), (8.4245, -47.5, -16, -2.5), (8.586, -49.5, -7, 0.5),
                (8.6148, -46, -7, -9), (8.7156, -35.5, -22, -7.5), (8.747, -46, -16, -4)]


def skips():
    """Modal impact: the circling marble skips and taps the funnel."""
    skip = lambda: strike(TAP_MODES, FUNNEL_SHELL, shell_db=8.5, shell_t60=0.058, scatter_db=3.0, detune=0.0162)
    return blows(FUNNEL_SKIPS, skip, thud_db=-15.5, clack_db=-9.0, snap_db=-2.0, edge_db=-28.0)


# the hum swells as the marble runs near the rim: (time [s], relative level [dB])
RIM_SWELLS = [(3.347, -52), (3.6, -56), (3.732, -68), (3.919, -54), (4.371, -58.5), (4.734, -53)]


def rim_hum(hz=692, sag_hz=50, fade_db_per_s=69.5):
    """Modulated resonance: a low note of the funnel pulses, its pitch dipping in each swell."""
    swells = [swell(s, 0, fade_db_per_s, fade_db_per_s) for s, _ in RIM_SWELLS]
    level = sum(amp(db) * shape for (_, db), shape in zip(RIM_SWELLS, swells))
    return level * gliding(hz - sag_hz * sum(swells), width_hz=55)


LAP_START_S, LAP_S, LAP_QUICKENS_PER_S = 6.9, 1.05, 0.1  # LAP_S holds at LAP_START_S
SCRAPE_HZ, SCRAPE_SINK_HZ = 2097, 247.8  # pitch at the loudest moment; how far it sinks in one lap
SCRAPE_DB, SCRAPE_SWING_DB, SCRAPE_GROWS_DB_PER_S = -72, 9.5, 7


def scrape():
    """Periodic modulation: a bright scrape swells and sinks once a lap, and grows as laps quicken."""
    t = TIME - LAP_START_S
    laps = t / LAP_S * (1 + LAP_QUICKENS_PER_S * t / 2)
    swing_db = SCRAPE_SWING_DB * np.cos(2 * np.pi * laps)
    level = descent() * amp(SCRAPE_DB + swing_db + SCRAPE_GROWS_DB_PER_S * t)
    hz = SCRAPE_HZ - SCRAPE_SINK_HZ * (laps - np.round(laps))
    return level * gliding(hz, width_hz=430, grain_db=1.5)


# a wall resonance climbs on the far side of a lap: (start [s], relative level [dB])
WALL_CLIMBS = [(6.28, -53), (7.27, -54), (8.22, -51.5)]


def climbs(length=0.54, hz=1355, rise_hz_per_s=1450):
    """Sweeping resonance: a broken, grainy band climbs in pitch at each listed start."""
    starts = np.array([s for s, _ in WALL_CLIMBS])
    t = TIME - starts[np.maximum(np.searchsorted(starts, TIME) - 1, 0)]  # since the latest start
    level = sum(amp(db) * swell(s, length, rise_db_per_s=400, fall_db_per_s=157) for s, db in WALL_CLIMBS)
    return level * gliding(hz + rise_hz_per_s * np.clip(t, 0, length), width_hz=380, grain_db=4)


def scene():
    """Superposition of the toy, its reverberation and the room tone; swings, rush and bend stay dry."""
    track = chute_runs() + knocks() + coasting() + clicks() + bumps() + ping()
    funnel = slide() + stand() + funnel_roll() + ticks() + skips() + rim_hum() + scrape() + climbs()
    toy = track + funnel
    hollow_pieces = swings() + rush() + bend_hum()
    return (toy + hollow_pieces + amp(-9.5) * room(toy) + room_tone())[None]


def record(dry, top_hz=15550):
    """Band limiting: nothing passes at or above top_hz."""
    passes = np.fft.rfftfreq(2 * N, 1 / SR) < top_hz
    return irfft(rfft(dry, 2 * N) * passes)[:, :N]


dry = scene()
out = record(dry)
wav_out(out)
```